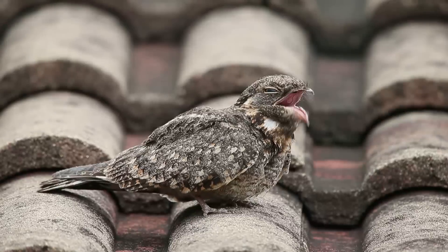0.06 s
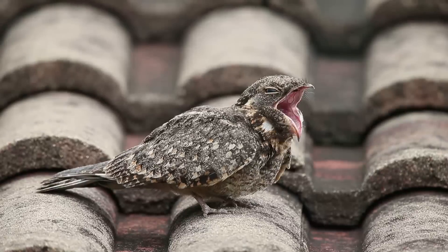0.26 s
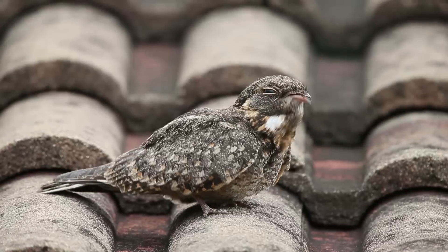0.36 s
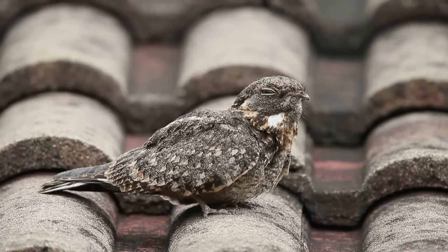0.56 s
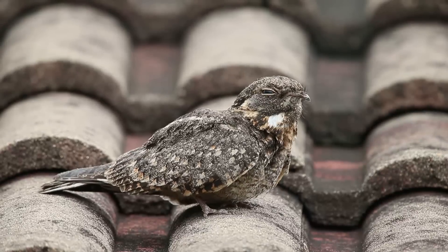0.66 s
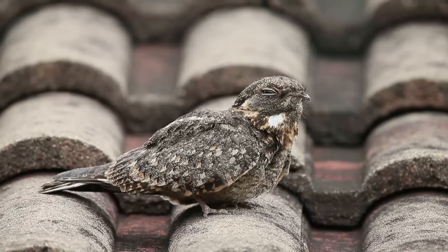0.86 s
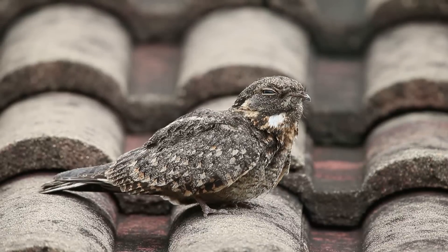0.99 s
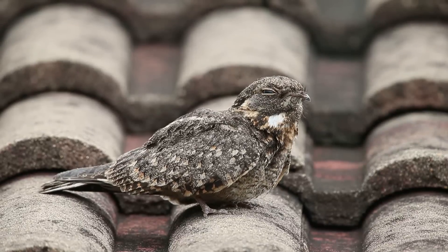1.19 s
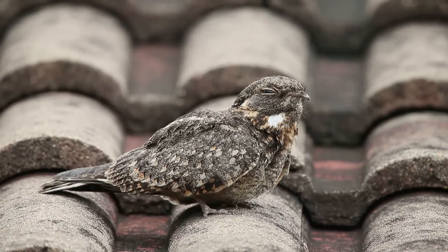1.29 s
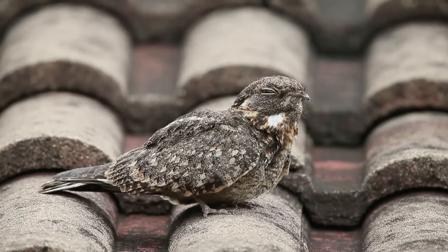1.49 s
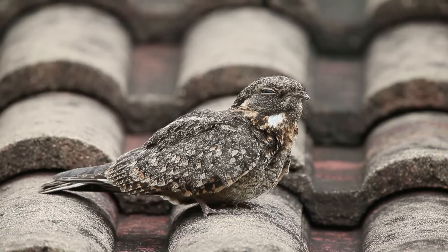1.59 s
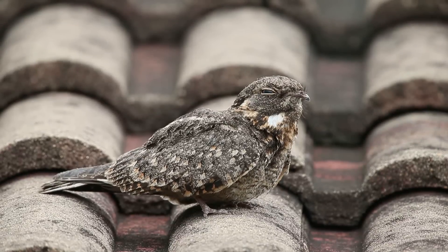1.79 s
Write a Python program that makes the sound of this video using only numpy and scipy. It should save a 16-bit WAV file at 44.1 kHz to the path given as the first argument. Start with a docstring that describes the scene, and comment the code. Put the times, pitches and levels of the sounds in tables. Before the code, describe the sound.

A nightjar gives one loud, harsh, trilling call close by on a tiled roof, with a short echo. About a second later come a soft tick and another bird's thin falling whistle, over faint outdoor rumble and hiss.

```python
"""Nightjar on a tiled roof

One harsh call, a frequency-modulated whistle, dives, climbs with a very fast trill and ends in two
clean arches. Reflection from tiles and walls returns it as a short echo. Later something ticks softly
(damped noise) and another bird whistles a thin falling note. Behind them lie a faint far tone,
a low rumble, a distant machine's hum and an insect-like hiss."""
import sys
import numpy as np
from scipy import signal
from scipy.fft import rfft, irfft
from scipy.io import wavfile
from scipy.ndimage import uniform_filter1d

SR = 44100
rng = np.random.default_rng(int(sys.argv[2]) if len(sys.argv) > 2 else 0)


def to_wav(sig):
    """Store sig (one row per channel, or 1-D mono) as 16-bit WAV at the path in sys.argv[1].

    Samples outside -1..1 are clipped; the rate is SR.
    """
    pcm = np.clip(np.atleast_2d(sig), -1, 1) * 32767
    pcm = np.round(pcm).astype(np.int16)
    wavfile.write(sys.argv[1], SR, pcm.T)  # frames by channels


N = 81585

CALL_START_S, CALL_END_S = 0.234, 0.473
TRILL_START_S, TRILL_END_S, TRILL_HZ = 0.2402, 0.4, 189.8
SLACK_HZ, TAUT_HZ = 2330, 3340  # pitches at which the membranes are fully slack and fully taut
PULSE_DB, SHIMMER_DB, RASP_DB, SLACK_RASP_DB = 3, -0.47, -38, -48
# Centre pitch about which the trill swings: time_s, pitch_hz
CALL_PITCH = [(.235, 4298), (.241, 4070), (.244, 3463), (.249, 3245), (.258, 2848), (.269, 2658),
              (.279, 2402), (.29, 2566), (.305, 2822), (.32, 3060), (.345, 3229), (.37, 3380), (.385, 3550),
              (.397, 3694), (.400, 4402), (.405, 4476), (.417, 4358), (.425, 4080), (.431, 3292),
              (.438, 3110), (.448, 3134), (.453, 3806), (.458, 4126), (.464, 4170), (.471, 3920)]
# Source strength ahead of the throat: time_s, fundamental_db, overtones_db
CALL_EFFORT = [(.236, -15.5, -12.5), (.245, -13.5, -13.5), (.254, -19, -16), (.264, -17, -30),
               (.282, -22, -30), (.3, -15, -22.5), (.32, -18.5, -19), (.345, -11.5, -17), (.37, -14, -16.5),
               (.395, -14.5, -14.5), (.404, -7.5, -21), (.42, -13.5, -18), (.44, -18.5, -14),
               (.456, -11.5, -15), (.465, -17.5, -18)]
# Harmonic series, from the fundamental up: gain_db, slack_change_db
CALL_HARMONICS = [(-2.5, 0.5), (-1, -7.5), (2, -5), (-8, 14), (-19, 24)]
# Resonances of the throat and open beak: frequency_hz, gain_db
THROAT_GAIN = [(1750, -45), (2120, -12), (2450, -4.5), (3150, -7), (3750, -2.5), (4100, -0.5), (4480, -1.5),
               (4900, 1.5), (5400, -6), (6000, -.5), (7300, -6.5), (8350, 0), (9000, -3.5), (10000, -18.5),
               (11400, -27.5), (12700, -40), (14700, -29), (15800, -42)]
# Change in those resonances at the widest gape, on the lowest notes: frequency_hz, change_db
GAPE_CHANGE = [(3600, 3.5), (5600, -5), (6800, 10), (7700, 7), (9200, -18.5), (10300, 7), (11500, 19),
               (12700, 9), (15000, 6)]
def nightjar():
    """Source and filter: trilled harmonics sweep the throat's resonances; slack membranes add roughness."""
    since = np.arange(N) / SR - TRILL_START_S
    centre_hz = uniform_filter1d(curve(CALL_PITCH, 1), size=90)
    slack = np.interp(centre_hz, [SLACK_HZ, TAUT_HZ], [1, 0])
    trilling = gate(TRILL_START_S, TRILL_END_S, attack_s=0.0042, release_s=0.0042)
    trill_phase = 2 * np.pi * TRILL_HZ * since + 0.18 * wobble(65)
    trill = trilling * (np.cos(trill_phase) + 0.24 * np.cos(2 * trill_phase))  # a skewed swing
    # The swing widens as the trill begins, and no two swings are quite alike.
    swing_hz = np.interp(since, [0, 0.068], [271, 423]) * (1 + 0.069 * wobble(120))
    jitter = 0.0038 + trilling * (0.0062 + 0.0077 * slack)  # share of the pitch
    hz = (centre_hz + swing_hz * trill) * (1 + jitter * wobble(730))
    phase = 2 * np.pi * np.cumsum(hz) / SR
    fundamental = undb(curve(CALL_EFFORT, 1) + PULSE_DB * trill)  # swells at the top of each swing
    overtones = undb(curve(CALL_EFFORT, 2))
    voice = np.zeros(N)
    for k, (gain_db, slack_change_db) in enumerate(CALL_HARMONICS, 1):
        strength = (fundamental if k == 1 else overtones) * undb(gain_db + slack_change_db * slack)
        resonance = response(THROAT_GAIN, k * hz) * response(GAPE_CHANGE, k * hz) ** slack
        voice += strength * resonance * np.sin(k * phase) * (k * hz < SR / 2)
    rasp_gain = (undb(RASP_DB) + undb(SLACK_RASP_DB) * slack) * fundamental * trilling
    rasp = rasp_gain * noise(lambda f: response(THROAT_GAIN, f))
    shimmer = undb(SHIMMER_DB * trilling * wobble(280))
    return (voice * shimmer + rasp) * gate(CALL_START_S, CALL_END_S, attack_s=0.0027, release_s=0.0057)


# The other bird's falling note: time_s, pitch_hz, level_db
LOWER_VOICE = [(1.48, 3676, -67), (1.512, 3620, -54), (1.52, 3310, -44), (1.548, 3195, -45.5),
               (1.572, 2990, -40), (1.59, 2880, -48), (1.67, 2900, -59.5), (1.735, 2896, -45),
               (1.77, 2888, -48.5), (1.785, 2760, -65)]
# Its second, higher voice early in the note: time_s, pitch_hz, level_db
HIGHER_VOICE = [(1.51, 3750, -58), (1.525, 3670, -45.5), (1.553, 3446, -48.5), (1.575, 3300, -63),
                (1.615, 3400, -62), (1.69, 3300, -68)]
# Second harmonic relative to the fundamental: frequency_hz, gain_db
OCTAVE_GAIN = [(5850, -20.5), (6500, -36), (7200, -10), (7600, -24)]
def whistling_bird():
    """Biphonation: two slightly unsteady tones sound at once, each with a weak second harmonic."""
    note = np.zeros(N)
    for voice in (LOWER_VOICE, HIGHER_VOICE):
        hz = curve(voice, 1) * (1 + 0.0118 * wobble(150))
        phase = 2 * np.pi * np.cumsum(hz) / SR
        tone = np.sin(phase) + response(OCTAVE_GAIN, 2 * hz) * np.sin(2 * phase)
        envelope = gate(voice[0][0], voice[-1][0] + 0.022, attack_s=0.011, release_s=0.01)
        note += tone * undb(curve(voice, 2)) * envelope
    return note


# Spectral envelope of the tick: frequency_hz, gain_db
TICK_SPECTRUM = [(700, -25), (1200, -26), (1600, 3), (1950, 10), (2900, -24), (4000, -3), (5100, -15),
                 (6100, -8), (6800, -16), (7900, 1.5), (10000, -24), (15000, -37)]
def tick(start_s=1.329, level_db=-44.5, t60_s=0.09):
    """Exponential damping: coloured noise starts abruptly and dies away as one soft tick."""
    since = np.arange(N) / SR - start_s
    decay = (since > 0) * np.exp(-np.log(1000) * np.abs(since) / t60_s)
    return undb(level_db) * decay * noise(lambda f: response(TICK_SPECTRUM, f))


# Reflections from the roof tiles: delay_s, gain_db
TILE_REFLECTIONS = [(.0021, -15), (.0063, -11.5)]
def tiles(direct):
    """Comb filtering: the direct sound interferes with its early reflections from the roof."""
    t = np.arange(N) / SR
    return direct + sum(undb(db) * np.interp(t - delay_s, t, direct) for delay_s, db in TILE_REFLECTIONS)


WALL_DELAY_S, WALL_SPREAD_S, WALL_DB = 0.057, 0.0033, -22
# Colour of the scattered sound: frequency_hz, gain_db
YARD_SPECTRUM = [(1500, -9.5), (3100, 8), (4400, -1.5), (6300, -4), (7400, -5), (8400, -4.5), (9400, 1),
                 (13000, 1)]
def yard(source, tail_db=-11.5, t60_s=0.47, build_s=0.002):
    """Reverberation: scattering gives a diffuse, decaying tail, and a wall adds one smeared echo."""
    t = np.arange(N) / SR
    tail = unit((1 - np.exp(-t / build_s)) * np.exp(-np.log(1000) * t / t60_s))
    wall = unit(np.exp(-((t - WALL_DELAY_S) / WALL_SPREAD_S) ** 2))
    envelope = np.hypot(undb(tail_db) * tail, undb(WALL_DB) * wall)  # incoherent sounds add in power
    colour = response(YARD_SPECTRUM, np.arange(N // 2 + 1) * SR / N)
    scatter = irfft(rfft(rng.standard_normal(N)) * colour, N)
    return signal.fftconvolve(source, scatter * envelope / np.sqrt(N))[:N]


def far_tone(pitch_hz=1484, level_db=-61.5):
    """Simple harmonic motion: a faint, distant sine tone of almost constant pitch."""
    hz = pitch_hz * (1 + 0.0019 * wobble(19))
    phase = 2 * np.pi * np.cumsum(hz) / SR
    return undb(level_db) * np.sin(phase) * gate(start_s=1.42, end_s=1.77, attack_s=0.05, release_s=0.05)


# Bands of low rumble and high hiss: centre_hz, width_hz, level_db
NOISE_BANDS = [(43, 13, -52.5), (129, 12.4, -58.5), (146.5, 200, -55), (3708, 110, -70), (8580, 520, -67.5)]
def rumble_and_hiss():
    """Band-limited noise: the low bands are heard as rumble, the high ones as an insect-like hiss."""
    return sum(undb(level_db) * noise(lambda f: 1 / (1 + (2 * (f - centre_hz) / width_hz) ** 4))
               for centre_hz, width_hz, level_db in NOISE_BANDS)


# Partials of a distant machine's hum: pitch_hz, level_db
HUM_PARTIALS = [(97, -65.5), (128, -59), (193.5, -64.5), (257, -64)]
def machine_hum(flutter_db=4, waver=0.017):
    """A line spectrum under random modulation: each partial drifts in level and in pitch."""
    hum = np.zeros(N)
    for pitch_hz, level_db in HUM_PARTIALS:
        gain = undb(level_db + flutter_db * wobble(5.2))
        hz = pitch_hz * (1 + waver * wobble(8.6))
        hum += gain * unit(np.sin(2 * np.pi * np.cumsum(hz) / SR))
    return hum


# Spectral envelope of the outdoor background: frequency_hz, gain_db
AIR_SPECTRUM = [(160, -40), (280, -2.5), (380, -4.5), (420, -5), (473, -6), (533, -5), (931, -8.5),
                (3480, -23.5), (3660, -23), (8680, -23), (16000, -30.5)]
def air(level_db=-52.5):
    """A continuous spectrum: steady broadband noise, strongest at a few hundred hertz."""
    return undb(level_db) * noise(lambda f: response(AIR_SPECTRUM, f))


def undb(db):
    """Decibels to amplitude ratio."""
    return 10 ** (np.asarray(db) / 20)


def unit(x):
    """Normalisation to rms 1."""
    return x / np.sqrt(np.mean(x ** 2))


def curve(table, column):
    """Linear interpolation of one table column over time."""
    rows = np.array(table)
    return np.interp(np.arange(N) / SR, rows[:, 0], rows[:, column])


def gate(start_s, end_s, attack_s, release_s):
    """An envelope with raised-cosine attack and release."""
    t = np.arange(N) / SR
    ramp = np.clip(np.minimum((t - start_s) / attack_s, (end_s - t) / release_s), 0, 1)
    return np.sin(np.pi / 2 * ramp) ** 2


def response(points, hz):
    """Frequency response: the amplitude ratio at hz, from rows of frequency_hz, gain_db."""
    rows = np.array(points)
    return undb(np.interp(np.log(np.maximum(hz, 1)), np.log(rows[:, 0]), rows[:, 1]))


def noise(shape):
    """Spectral shaping: white noise weighted by shape(frequency_hz), at rms 1."""
    hz = np.arange(N // 2 + 1) * SR / N
    return unit(irfft(rfft(rng.standard_normal(N)) * shape(hz), N))


def wobble(rate_hz):
    """Low-pass noise: random motion up to about the given rate."""
    return noise(lambda f: 1 / (1 + (f / rate_hz) ** 2))


def scene():
    """Superposition: both birds and the tick reverberate in one yard, over the background."""
    call, whistle, tap = nightjar(), whistling_bird(), tick()
    echo = yard(call + undb(3.5) * whistle + undb(3) * tap)  # farther sources are more reverberant
    background = far_tone() + rumble_and_hiss() + machine_hum() + air()
    return (tiles(call) + whistle + tap + echo + background)[None]


def record(dry, low_cut_hz=50, high_cut_hz=15650):
    """Band limiting: filters remove the deepest rumble and the highest treble."""
    high_pass = signal.butter(6, low_cut_hz, "high", fs=SR, output="sos")
    low_pass = signal.ellip(10, 0.2, 70, high_cut_hz, fs=SR, output="sos")
    return signal.sosfilt(low_pass, signal.sosfilt(high_pass, dry))


dry = scene()
out = record(dry)
to_wav(out)
```